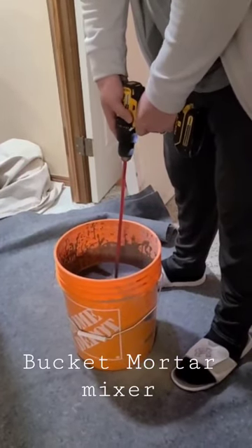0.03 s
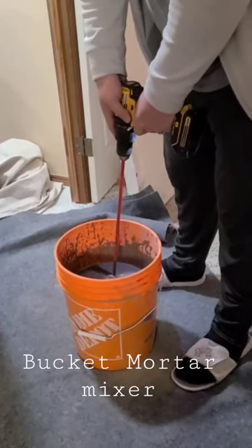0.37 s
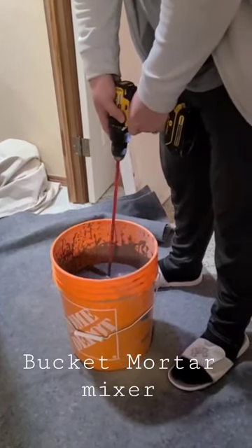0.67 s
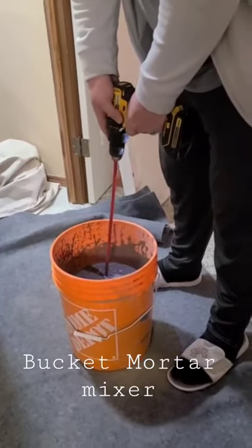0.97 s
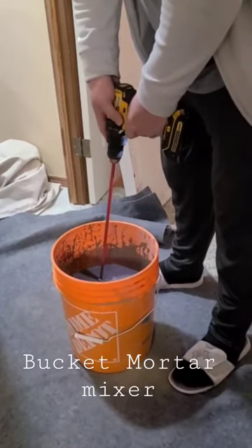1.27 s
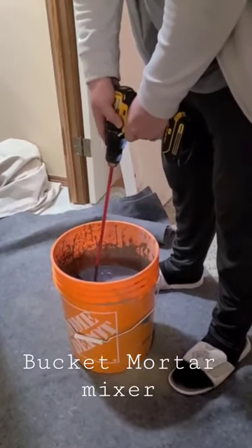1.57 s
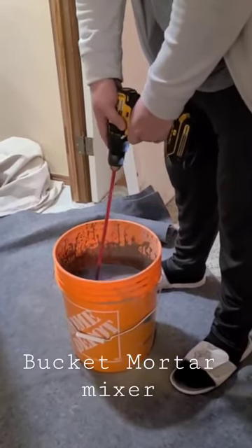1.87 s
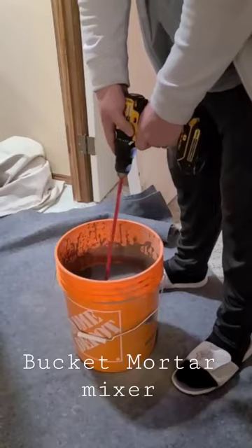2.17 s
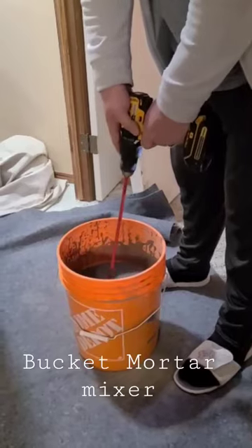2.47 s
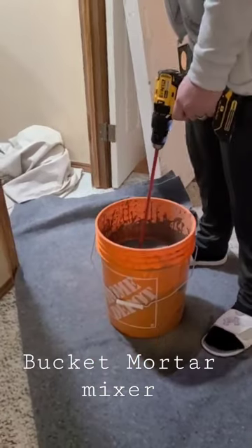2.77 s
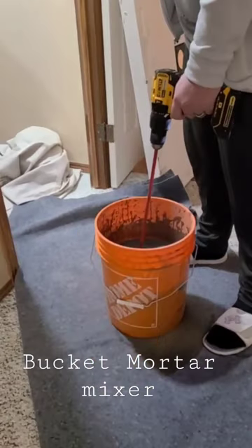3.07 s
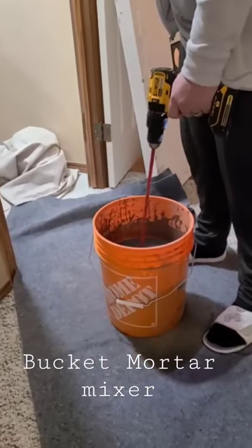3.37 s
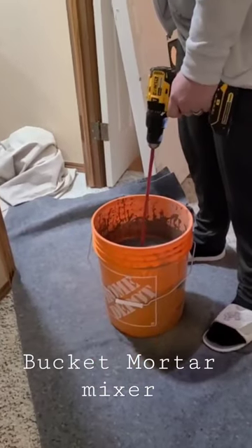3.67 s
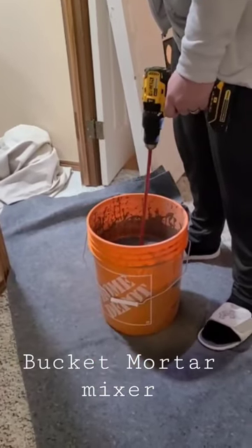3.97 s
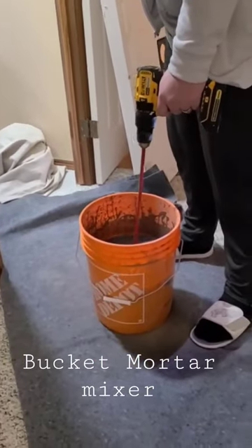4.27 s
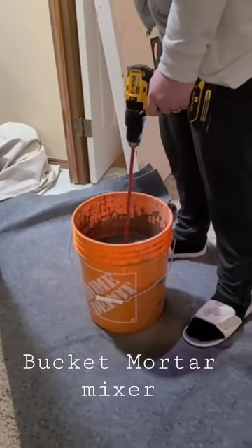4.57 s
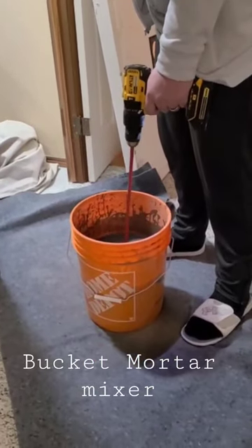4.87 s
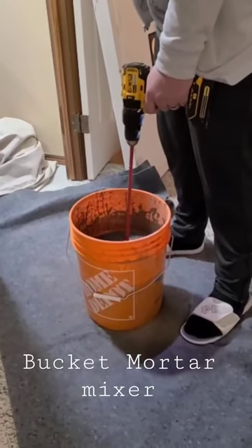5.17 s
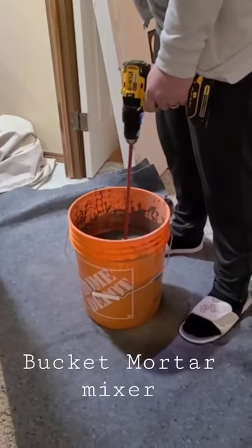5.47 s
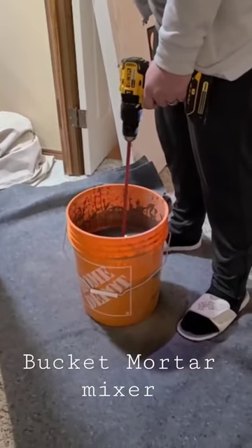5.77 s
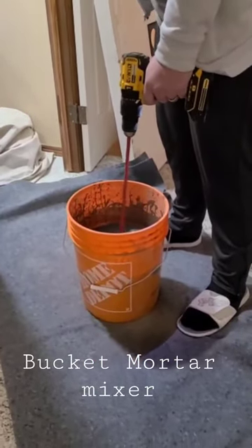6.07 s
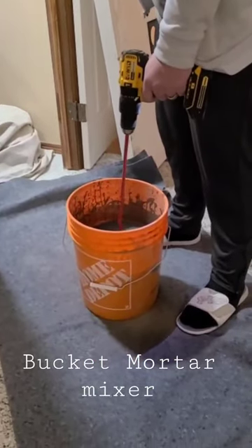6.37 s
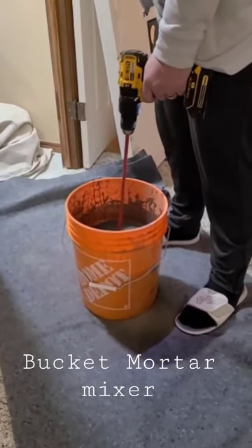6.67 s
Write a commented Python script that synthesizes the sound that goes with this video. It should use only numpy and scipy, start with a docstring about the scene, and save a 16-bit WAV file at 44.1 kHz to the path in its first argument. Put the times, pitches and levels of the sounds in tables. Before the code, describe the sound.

Indoors, a drill motor whirs and rattles as its mixing paddle stirs mortar, with occasional knocks and scrapes on a plastic bucket.

```python
"""A cordless drill turns a mixing paddle in a plastic bucket of wet mortar, in a small carpeted room.
The motor whine swells and fades over a wobbling gear whir, rattling teeth and fan hiss. Underneath,
the blades churn the mortar, knock and squeak on the bucket wall and shove its floor into soft thuds.
Two stretches of mixing, heard from slightly different places, are parted by a moment of silence;
the second opens with the motor bogged down until the paddle breaks free."""
import sys
import numpy as np
from scipy import signal
from scipy.fft import rfft, irfft, next_fast_len
from scipy.io import wavfile
from scipy.ndimage import uniform_filter1d

SR = 44100
rng = np.random.default_rng(int(sys.argv[2]) if len(sys.argv) > 2 else 0)


def generate_wav(signal):
    """Clip the signal to [-1, 1] and save it as 16-bit WAV at the path in sys.argv[1]."""
    frames = np.transpose(np.atleast_2d(signal))
    scaled = np.clip(frames, -1, 1) * 32767
    pcm = np.round(scaled).astype(np.int16)
    wavfile.write(sys.argv[1], SR, pcm)


N = 305172

# the two stretches of mixing: start/s, end/s
MIX_SPANS = [(-.1, 2.883), (2.982, 7.0)]
# how alike the reflections are at the two ears: f/Hz, likeness/0-1
EAR_LIKENESS = [(100, 0.83), (350, 0.93), (700, 0.12), (1500, 0)]
# stereo balance, one table per stretch: f/Hz, left minus right/dB
BALANCE = [
    [(150, -2), (350, 0), (700, -7), (1400, -6.5), (2400, -3), (6000, 0.5), (15000, 0.5)],
    [(150, -1), (350, -2), (700, -6), (1300, -2.5), (2400, -2), (6000, -1), (15000, 0.8)],
]
# lateness of the bucket on the right, one row per stretch: delay/samples
BUCKET_DELAYS = [(13,), (7,)]
# modes of the bucket wall: f/Hz, level/dB, t60/s
WALL_MODES = [(795, -13.5, .035), (960, -10, .02), (1200, -5, .015), (1350, -2, .02), (1480, 0, .02),
              (1720, -3, .015), (3500, -12, .003)]
# modes of the loaded bucket floor: f/Hz, level/dB, t60/s
FLOOR_MODES = [(118.05, -13.5, 0.066), (160, -13.5, 0.15), (251, -4.5, 0.12), (311.6, 2.5, 0.14),
               (493, 1, 0.076)]
# soft shoves on the bucket floor: t/s, level/dB
FLOOR_SHOVES = [(1.44, -49), (2.491, -43), (2.843, -42), (3.169, -59), (4.022, -46), (4.116, -45),
                (4.59, -51), (5.153, -42), (5.256, -44), (5.363, -41), (6.275, -44.5), (6.6, -41),
                (6.713, -42.5), (6.827, -46)]
# blade hits and grazes on the wall: t/s, level/dB, pitch of the spot/Hz, attack/s, judder share/0-1
WALL_HITS = [(1.115, -18, 1100, .012, .85), (1.285, -18, 1380, .012, .9), (1.438, -15.5, 1370, .007, .7),
             (1.675, -18, 1350, .012, .9), (1.778, -14, 1300, .01, .9), (1.984, -16, 1150, .006, .9),
             (2.11, -16.5, 1200, .008, .9), (2.32, -15, 1350, .01, .8), (2.355, -2, 1490, .002, .65),
             (2.367, -7, 1490, .003, .7), (2.381, -11, 1180, .003, .7), (2.394, -8.5, 1510, .009, .65),
             (2.468, -1.5, 1330, .005, .6), (2.489, -2.5, 1440, .003, .75), (2.592, -10.5, 1210, .012, .5),
             (2.611, -8, 1420, .008, .9), (3.914, -16.5, 1320, .005, .6), (4.022, -19, 1300, .006, .8),
             (5.062, -18.5, 1160, .005, .7), (5.258, -12, 1310, .004, .3), (5.360, -11, 1320, .002, .25),
             (5.577, -13.5, 800, .004, .15), (5.578, -14, 1430, .006, .7), (5.688, -10, 1520, .008, .8),
             (5.792, -12.5, 1370, .014, .55), (6.022, -14, 1290, .005, .35), (6.028, -18, 805, .008, .2),
             (6.141, -12.5, 1310, .005, .4), (6.254, -15.5, 1300, .007, .6), (6.386, -14, 1330, .005, .4),
             (6.602, -7, 1270, .003, .25), (6.714, -19, 1300, .006, .9), (6.825, -12, 1305, .003, .35)]
# gearbox mix, one row per stretch: rattle/dB, hiss/dB
GEARBOX_MIX = [(-27.5, -29), (-26, -26.5)]
# level ride of the gears, dipping in stiffer mortar: t/s, level/dB
GEAR_RIDE = [(1.9, 1.6), (2.8, 0.3), (3.0, -2), (3.4, -3.8), (4.1, -1)]
# colour of the tooth rattle, one table per stretch: f/Hz, level/dB
RATTLE_EQ = [
    [(40, -25), (80, -14), (130, -21), (240, -47), (320, -12), (600, -7.5), (800, -0.5), (1100, -6.5),
     (1500, -24), (1720, -3.5), (2500, -5.5), (4500, -12), (7000, -50)],
    [(40, -20.5), (80, -8), (130, -22.5), (240, -20.5), (340, -11), (600, -6), (780, -2), (900, -6.5),
     (1080, 4.5), (1500, 2.5), (2200, -1), (2600, -3.5), (4000, -11), (7000, -14.5)],
]
# housing resonances, one table per stretch: f/Hz, width/Hz, level/dB
HOUSING_MODES = [
    [(1340, 87, 9), (1441, 15, 10), (2296, 31, -5), (3780, 180, -6)],
    [(1374, 47, -2), (2360, 45, -8.5), (3580, 130, -5.5), (4355, 160, -2.5), (4750, 102, -0.5)],
]
# colour of the fan and gear hiss: f/Hz, level/dB
HISS_EQ = [(600, -38), (2000, -1.5), (3200, -3.5), (4500, -2), (6000, -0.5), (7200, -4), (9000, -1.5),
           (10700, -12), (12500, -4), (14000, -8), (15500, -3)]
# path of the gear whir: t/s, pitch/multiple of motor speed, level/dB
WHIR_CURVE = [(0, 5.0, -34), (.45, 4.98, -30), (.9, 4.97, -33.5), (2.7, 4.89, -32.5), (3.2, 4.87, -38),
              (4.1, 4.92, -36.5), (4.6, 5.07, -34.5), (5.6, 5.02, -36.5), (6.2, 5.02, -33.5),
              (6.9, 5.0, -36.5)]
# motor and bearing partials: pitch/multiple of motor speed, blurred share/0-1
PARTIALS = [(.2, .3), (1, .7), (2, .7), (4.2, .8), (7.13, .4), (8.92, .9), (10, .6), (11.71, .95),
            (12.56, .45), (13.57, .65), (14.65, .7), (21, .6)]
# their levels, row for row: first stretch/dB, second stretch/dB
PARTIAL_LEVELS = [(-60.5, -59.5), (-49.5, -48), (-46, -42), (-43.5, -43.5), (-46, -51), (-45, -44.5),
                  (-43.5, -41.5), (-79, -43.5), (-41, -45.5), (-41, -45), (-55, -46), (-47.5, -53)]
# swell of the whine as the drill sways: t/s, level/dB
WHINE_RIDE = [(0, -43), (0.85, -40), (1.08, -33.5), (1.5, -37.5), (1.8, -46), (2.15, -36), (2.45, -33),
              (2.75, -35.5), (3.3, -33.5), (4.25, -35), (4.5, -40.5), (4.9, -48), (5.35, -37.5),
              (5.65, -41.5), (6.1, -39), (6.75, -40.5)]
# phase lead of the left ear, one row per stretch: whine/rad, whir/rad
LEFT_LEADS = [(.4, -.8), (.9, .8)]

CRUISE_HZ, BOGGED_LOSS_HZ = 413.7, 37.0   # motor speed running free; speed lost in stiff mortar
PADDLE_RATIO, CARRIER_RATIO = 45.75, 9.6   # motor turns per turn of paddle and of planet carrier
BREAK_FREE_AT_S, PICKUP_S = 3.17, .026   # middle and time constant of the run-up
KNOCK_DRAG_HZ, DRAG_S = 9.0, .025   # speed that a 0 dB knock costs; time to the deepest sag
LABOUR_WHINE_DB, LABOUR_HUM_DB, LABOUR_GEARS_DB = -9.5, 4.5, -3   # level shifts at full labour
JUDDERS_PER_S, SQUEAK_WAVER = 2300, .027   # slips of a rubbing blade; relative pitch waver
THUD_HZ, THUD_T60_S, THUD_ATTACK_S = 160.6, .12, .008
ROOM_T60_S, WASH_DB, RIGHT_LAG_SAMPLES = .063, 5, 11.51


def from_db(db):
    """Decibels to gain."""
    return 10 ** (np.asarray(db) / 20)


def unit_rms(x):
    """Scale to rms 1."""
    return x / np.sqrt(np.mean(x ** 2) + 1e-20)


def curves(rows):
    """The columns of an automation table, one value per sample."""
    times, *columns = np.transpose(rows)
    return [np.interp(np.arange(N) / SR, times, column) for column in columns]


def per_stretch(rows):
    """The columns of a table with one row per stretch, one value per sample."""
    return np.array(rows)[(np.arange(N) / SR > MIX_SPANS[0][1]).astype(int)].T


def at_hz(points, hz):
    """Read a spectrum on a log-frequency axis."""
    known_hz, values = np.transpose(points)
    return np.interp(np.log(hz + 1e-3), np.log(known_hz), values)


def equalise(x, spectrum):
    """Colour a sound, keeping its timing."""
    return irfft(rfft(x) * from_db(at_hz(spectrum, np.fft.rfftfreq(N, 1 / SR))), N)


def drift(rate_hz):
    """A smooth random modulator with spread 1."""
    r = np.exp(-40 * np.pi * rate_hz / SR)
    slow = signal.lfilter([1], [1, -2 * r, r * r], rng.standard_normal(N // 20 + 2002))[2000:]
    return np.interp(np.arange(N) / 20, np.arange(len(slow)), unit_rms(slow))


def angle(hz):
    """Running angle of something that turns hz times a second."""
    return 2 * np.pi * np.cumsum(hz) / SR


def resonance(x, hz, width_hz):
    """A resonant band with gain 1 at its peak."""
    r, w = np.exp(-np.pi * width_hz / SR), 2 * np.pi * hz / SR
    return signal.lfilter(np.array([1, 0, -1]) * (1 - r * r) / 2, [1, -2 * r * np.cos(w), r * r], x)


def ring(force, modes):
    """A force sets decaying modes ringing; neighbours swing in opposite senses."""
    out = 0
    for k, (hz, db, t60) in enumerate(modes):
        r, w = from_db(-60 / (t60 * SR)), 2 * np.pi * hz / SR
        mode = signal.lfilter([0, np.sin(w)], [1, -2 * r * np.cos(w), r * r], force + 1e-18)
        out = out + (-1) ** k * from_db(db) * mode
    return out


def impacts(per_s, spread_db):
    """Random tiny impacts of uneven size."""
    sizes = from_db(spread_db * np.minimum(rng.exponential(1, N), 4))
    return unit_rms((rng.random(N) < per_s / SR) * sizes * rng.choice([-1, 1], N))


def tone(phase, blur, blur_hz, lead):
    """A stereo tone, lead radians ahead on the left, blurred by reflections that fade in and out."""
    ears = []
    for direct in (phase, phase - lead):
        in_step = np.sqrt(2 * (1 - blur)) + np.sqrt(blur) * drift(blur_hz)
        ears.append(in_step * np.sin(direct) + np.sqrt(blur) * drift(blur_hz) * np.cos(direct))
    return np.array(ears)


def widen(mid, side, alike):
    """Mid and side to left and right, as alike as asked."""
    return np.sqrt(1 + alike) * mid + np.sqrt(1 - alike) * side * [[1], [-1]]


def room(x, lag, wet_db):
    """Direct sound, lag samples later on the right, and a short tail that is near mono in the bass."""
    size = next_fast_len(N + SR)
    t = np.arange(SR // 2) / SR
    tails = rng.standard_normal((2, len(t))) * from_db(-60 * t / ROOM_T60_S) * (t > .003)
    mid, side = rfft(tails / np.sqrt(np.sum(tails ** 2)), size)
    alike = at_hz(EAR_LIKENESS, np.fft.rfftfreq(size, 1 / SR))
    diffuse = widen(mid, side, alike) * (1 - alike / 2)   # a small room holds little diffuse bass
    wet = irfft(rfft(x, size) * diffuse, size)[:, :N]
    direct = np.array([x, np.interp(np.arange(N) - lag, np.arange(N), x)])
    return (direct + from_db(wet_db) * wet) / np.hypot(1, from_db(wet_db))


def floor_thuds():
    """Soft shoves of the paddle set the loaded bucket floor swinging."""
    t, out = np.arange(SR // 3) / SR, np.zeros(N + SR)
    envelope = (1 - np.exp(-t / THUD_ATTACK_S)) * from_db(-60 * t / THUD_T60_S)
    thud = envelope * np.sin(2 * np.pi * THUD_HZ * t)
    for at_s, db in FLOOR_SHOVES:
        start = int(at_s * SR)
        out[start:start + len(t)] += from_db(db) * thud / thud.max()
    return out[:N]


def mortar(rotor):
    """Each of the two blades slaps and drags wet mortar along the bucket once a turn."""
    push = from_db(np.sin(2 * rotor / PADDLE_RATIO) + 3.5 * np.tanh(drift(14)))
    grit = impacts(per_s=350, spread_db=-.5) * push
    scrape = from_db(-42) * unit_rms(ring(grit, WALL_MODES))
    rumble = from_db(-57) * unit_rms(ring(grit, FLOOR_MODES))
    return scrape + rumble


def blade_contact(spot_hz, attack_s, judder):
    """A blade presses and slips: the rubbed spot sings, judder shakes the bucket, sand scratches."""
    t = np.arange(SR // 4) / SR
    fade_s = (.002 + .01 * judder) * (1300 / spot_hz) ** 3   # lower spots ring longer
    pressure = np.minimum(t / attack_s, 1) * np.exp(-np.maximum(t - attack_s, 0) / fade_s)
    waver = unit_rms(uniform_filter1d(rng.standard_normal(len(t)), size=200))
    squeak = pressure * np.sin(angle(spot_hz * (1 + SQUEAK_WAVER * waver)))
    slips = pressure * rng.choice([-1, 1], len(t)) * (rng.random(len(t)) < JUDDERS_PER_S / SR)
    wall = unit_rms(ring(slips, WALL_MODES))
    floor = from_db(-18) * unit_rms(ring(slips, FLOOR_MODES))
    sand = from_db(-17.5) * unit_rms(slips)
    return np.sqrt(1 - judder ** 2) * squeak + judder * squeak.std() * (wall + floor + sand)


def wall_knocks():
    """Knocks, squeaks and grazes of the blades on the bucket wall."""
    out = np.zeros(N + SR)
    for at_s, db, spot_hz, attack_s, judder in WALL_HITS:
        start, hit = int(at_s * SR), blade_contact(spot_hz, attack_s, judder)
        out[start:start + len(hit)] += from_db(db) * hit
    return out[:N]


def grinding(per_s, spread_db, swing_db):
    """Dense impacts, later on the right, in a smoother stereo wash from the walls."""
    swing = from_db(swing_db)
    direct = impacts(per_s, spread_db) * swing
    alike = at_hz(EAR_LIKENESS, np.fft.rfftfreq(N, 1 / SR))
    mid, side = rfft(rng.standard_normal((2, N)) * uniform_filter1d(swing, size=200))
    wash = irfft(widen(mid, side, alike), N) / np.sqrt(2)
    return np.array([direct, np.roll(direct, round(RIGHT_LAG_SAMPLES))]) + from_db(WASH_DB) * wash


def gearbox(rotor, gears_db, gates):
    """Loose teeth rattle in the housing and hiss with the fan, pulsing with rotor, carrier and paddle."""
    rattle_db, hiss_db = per_stretch(GEARBOX_MIX)
    load_db = .3 * np.sin(rotor / CARRIER_RATIO) + .3 * np.sin(rotor / PADDLE_RATIO)
    load_db += .8 * np.tanh(drift(40))
    teeth = grinding(per_s=4000, spread_db=1.5, swing_db=2.55 * load_db + 2.3 * np.sin(rotor))
    rattle = 0
    for gate, spectrum, modes in zip(gates, RATTLE_EQ, HOUSING_MODES):
        housing = sum(from_db(db) * resonance(teeth, hz, width) for hz, width, db in modes)
        rattle = rattle + gate * unit_rms(equalise(teeth, spectrum) + housing)
    fizz = grinding(per_s=12000, spread_db=5, swing_db=load_db + .88 * np.sin(rotor))
    hiss = unit_rms(equalise(fizz, HISS_EQ))
    return from_db(rattle_db + .34 * gears_db) * rattle + from_db(hiss_db + gears_db) * hiss


def gear_whir(speed_hz, labour):
    """A rough tone near five times motor speed wobbles, chatters and ducks as the motor labours."""
    multiple, level_db = curves(WHIR_CURVE)
    wobble = np.sin(angle(13 + 4 * drift(8)))
    chatter_db = 3.5 * np.sin(angle(38 + 22 * drift(40)))
    pitch_hz = multiple * speed_hz + 14 * wobble + 22 * drift(50)
    pulses = unit_rms(from_db(1.8 * wobble + chatter_db))
    gain = from_db(level_db + LABOUR_GEARS_DB * labour)
    return gain * pulses * tone(angle(pitch_hz), blur=.35, blur_hz=45, lead=per_stretch(LEFT_LEADS)[1])


def motor_speed():
    """Turns per second: the motor sags at each knock and restarts bogged until the paddle breaks free."""
    t = np.arange(N) / SR
    bogged = (t > MIX_SPANS[0][1]) * (1 - np.tanh((t - BREAK_FREE_AT_S) / (2 * PICKUP_S))) / 2
    drag = sum(from_db(db) * np.exp(-np.minimum(((t - at_s) / DRAG_S - 1) ** 2, 20))
               for at_s, db, *_ in WALL_HITS)
    return CRUISE_HZ - BOGGED_LOSS_HZ * bogged - KNOCK_DRAG_HZ * drag


def motor(rotor, labour, gears_db, gates):
    """The rotor's eighth harmonic whines over motor and bearing tones; labour trades whine for hum."""
    whine_db = curves(WHINE_RIDE)[0] + LABOUR_WHINE_DB * labour
    lead = per_stretch(LEFT_LEADS)[0] + .3 * drift(1)
    out = from_db(whine_db) * tone(8 * rotor, blur=.25, blur_hz=45, lead=lead)
    for (multiple, blur), (first_db, second_db) in zip(PARTIALS, PARTIAL_LEVELS):
        hz = multiple * CRUISE_HZ
        gain = from_db(first_db) * gates[0] + from_db(second_db) * gates[1]
        swell_db = LABOUR_HUM_DB * labour * (multiple == 1) + np.tanh(drift(10))
        swell_db += 1.6 * gears_db * (hz > 5000)   # the top partials ride with the gears
        lead = 2 * np.pi * hz * RIGHT_LAG_SAMPLES / SR + .1 * multiple * drift(4)
        ears = tone(multiple * rotor, blur, blur_hz=20 + 2 * multiple, lead=lead)
        out = out + gain * from_db(swell_db) * (ears[0] if hz < 600 else ears)   # mono bass
    return out


def scene():
    """Drill and bucket in the room, gated into two stretches, each with its own stereo balance."""
    t = np.arange(N) / SR
    gates = [np.clip(np.minimum((t - start) / .014, (end - t) / .004), 0, 1) for start, end in MIX_SPANS]
    speed_hz = motor_speed()
    labour = (CRUISE_HZ - speed_hz) / BOGGED_LOSS_HZ   # 0 running free, 1 bogged down
    waver_hz = .8 * drift(12) + 4.8 * labour * drift(87)   # uneven mortar; a slowed motor runs rough
    rotor = angle(speed_hz + waver_hz)
    gears_db = curves(GEAR_RIDE)[0] + LABOUR_GEARS_DB * labour
    drill = motor(rotor, labour, gears_db, gates) + gear_whir(speed_hz, labour)
    drill += gearbox(rotor, gears_db, gates)
    bucket = mortar(rotor) + wall_knocks() + floor_thuds()
    mix = drill + room(bucket, lag=per_stretch(BUCKET_DELAYS)[0], wet_db=-5)
    out = 0
    for gate, balance in zip(gates, BALANCE):
        ears = [equalise(ear, np.array(balance) * [1, share]) for ear, share in zip(mix, (.5, -.5))]
        out = out + gate * np.array(ears)
    return out


def record(dry):
    """A soft clip rounds the highest peaks, then a steep low-pass cuts the top."""
    rounded = dry / (1 + (dry / .92) ** 4) ** .25
    return signal.sosfilt(signal.ellip(12, .1, 90, 15700, fs=SR, output="sos"), rounded)


dry = scene()
out = record(dry)
generate_wav(out)
```